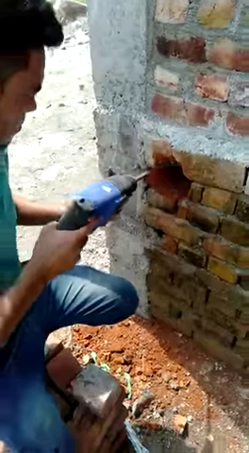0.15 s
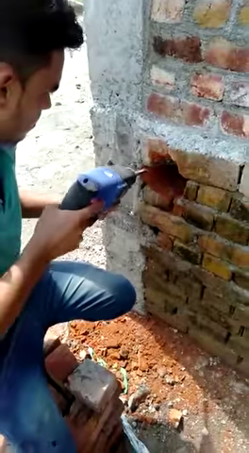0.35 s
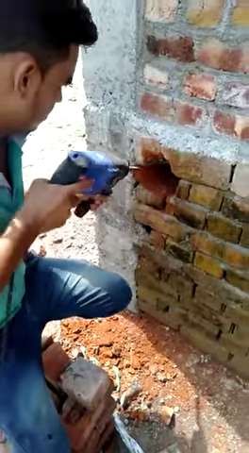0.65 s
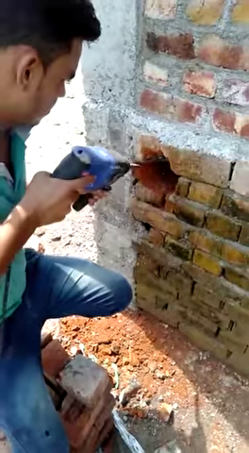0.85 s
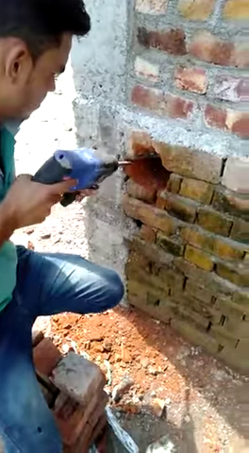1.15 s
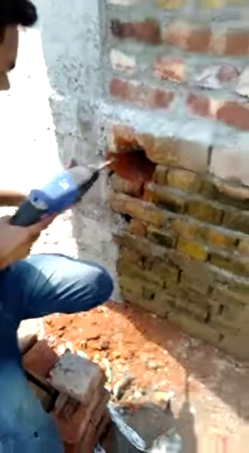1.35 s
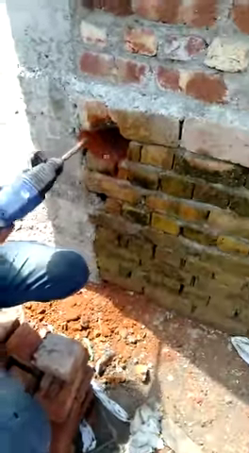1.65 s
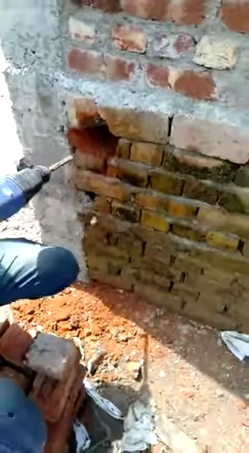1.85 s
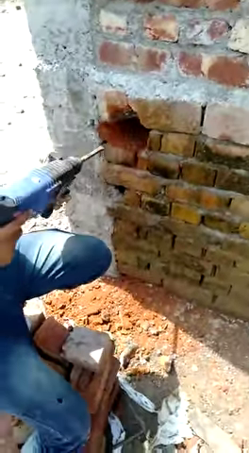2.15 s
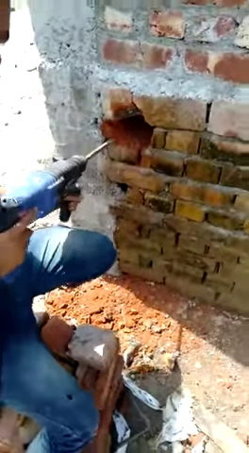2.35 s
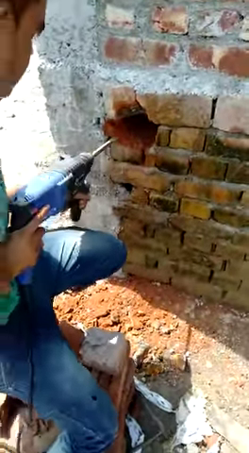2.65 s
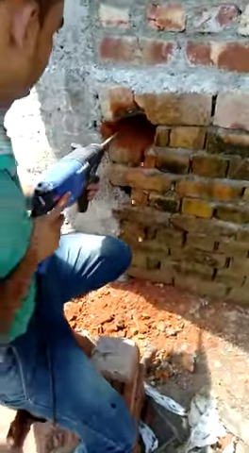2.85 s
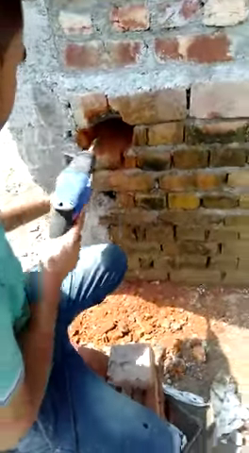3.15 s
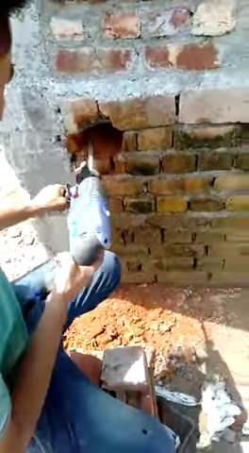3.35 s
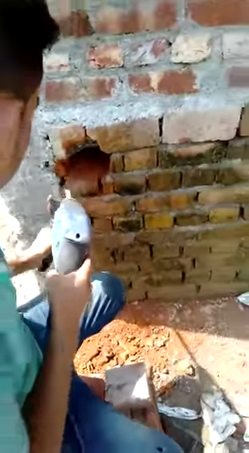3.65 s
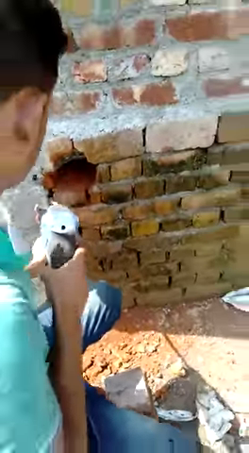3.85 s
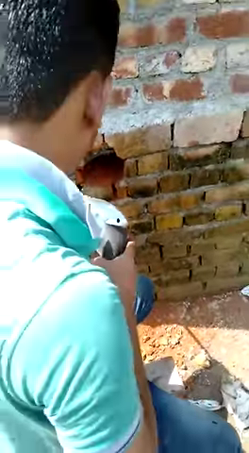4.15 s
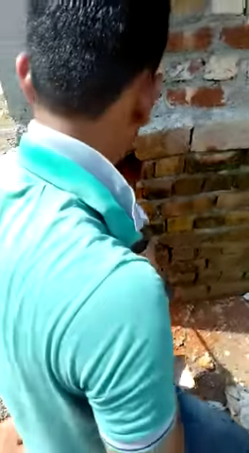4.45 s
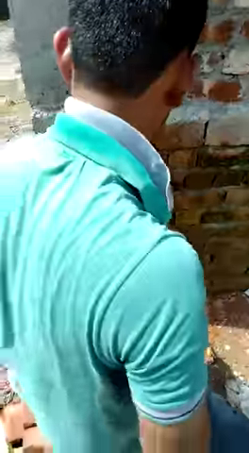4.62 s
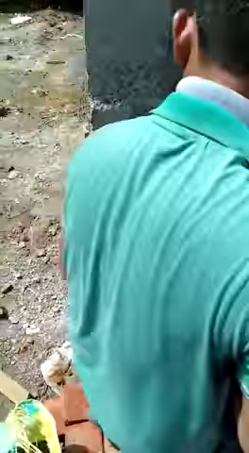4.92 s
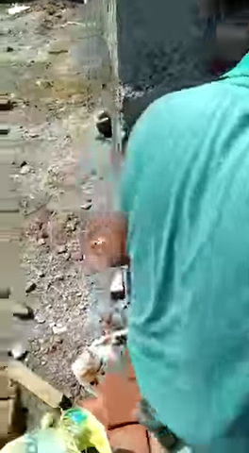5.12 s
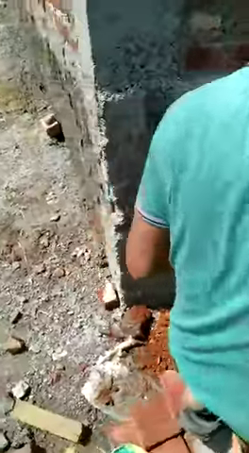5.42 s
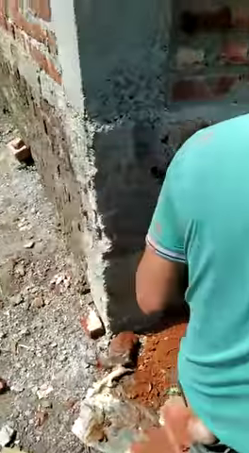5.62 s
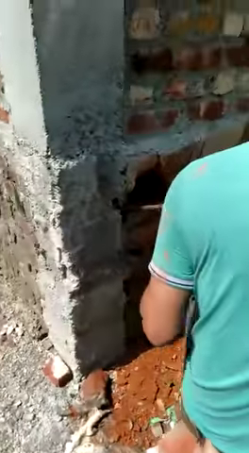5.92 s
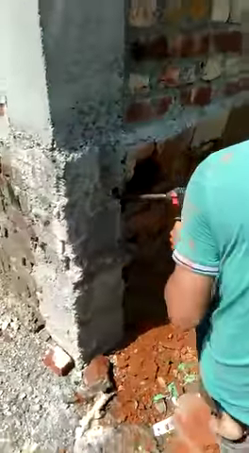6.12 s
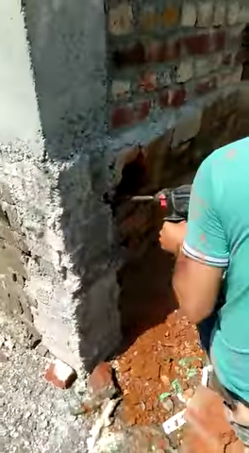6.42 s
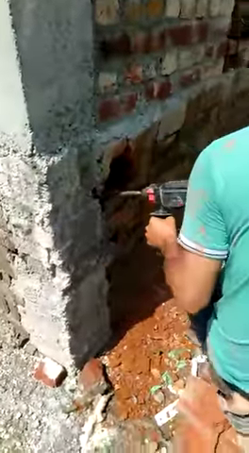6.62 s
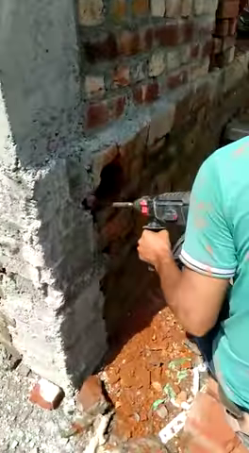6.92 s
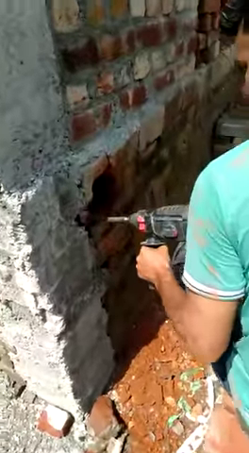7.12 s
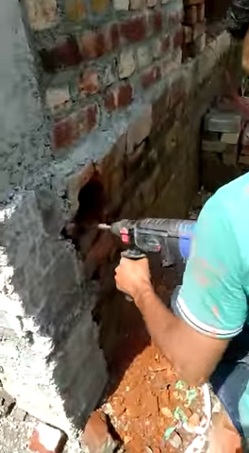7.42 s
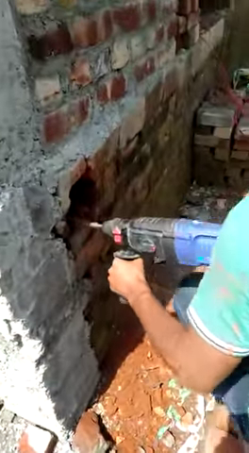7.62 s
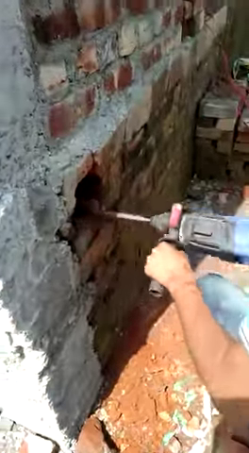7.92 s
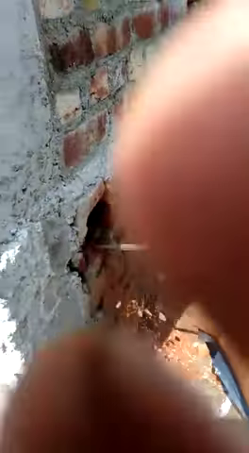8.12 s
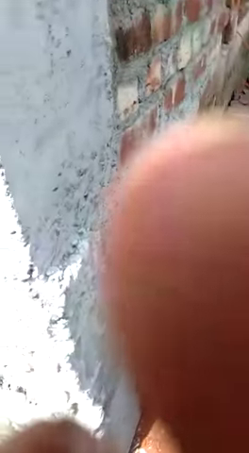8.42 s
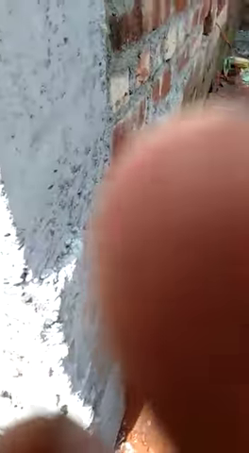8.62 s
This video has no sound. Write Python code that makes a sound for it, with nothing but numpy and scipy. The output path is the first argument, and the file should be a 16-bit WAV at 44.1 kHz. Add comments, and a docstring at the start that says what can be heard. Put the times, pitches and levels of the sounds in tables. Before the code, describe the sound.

Close by in the open air, a hammer drill buzzes and rattles against brick, then slows with a scatter of metallic clanks. It restarts, bites briefly, runs light with a duller gear whine for about two seconds, and digs in again before winding down. Gusts rumble and thump on the moving microphone, most strongly in the middle, and faint finger taps on its case finish the sound.

```python
"""A harsh, rapid hammering: an electric hammer drill chisels at a brick wall outdoors. A short burst
coasts down in loose clanks; a long one follows, runs light for two seconds midway and coasts down too.
Every piston stroke knocks the housing, rattles the gearbox and strikes the steel bit, while gears and
fan whine underneath. The microphone moves round behind the worker from right to left; wind buffets
its port, and a finger brushes its case at the end."""
import sys
import numpy as np
from scipy import signal
from scipy.fft import rfft, irfft
from scipy.io import wavfile
from scipy.ndimage import uniform_filter1d

SR = 44100
rng = np.random.default_rng(int(sys.argv[2]) if len(sys.argv) > 2 else 0)


def transcribe(u):
    """Save the signal u as a 16-bit wav file named by the first command-line argument.

    u: samples, shape (n,) or (channels, n), limited to [-1, 1]; the rate is SR.
    q: integer samples, one column per channel.
    """
    v = np.clip(np.atleast_2d(u).T, -1, 1)
    q = np.round(v * 32767).astype(np.int16)
    wavfile.write(sys.argv[1], SR, q)


N = 386757
T = np.arange(N) / SR
FULL_HZ = 66.2  # stroke rate at full speed

# Speed that trigger and load allow: t/s, stroke rate/Hz. All levels below are relative.
STROKE_RATE = [(0.0, 62), (0.1, 49.7), (0.2, 60.7), (0.35, 65.5), (0.7, 66.5), (1.1, 65.9), (1.47, 66.3),
               (2.8, 65.5), (3.1, 67.3), (3.45, 53.2), (4.03, 50.2), (4.15, 47.9), (4.55, 45.4),
               (5.015, 44.2), (5.205, 66.7), (5.42, 70.6), (5.56, 67.8), (5.66, 66.95), (5.92, 66.4),
               (7.44, 66.15)]
# Motor released: start/s, end/s, effort/dB, rate below which blows weaken/Hz,
# change per halving of that rate/dB, extra while the bit still leans on the brick/dB
COASTS = [(1.486, 2.476, -30.5, 29.3, -6.5, 4), (7.425, 8.772, -31, 36, -5.5, 0.5)]
# How hard the drill works in four successive stretches: t/s, level/dB
FIRST_PUSH = [(0.0, -27), (0.032, -27.5), (0.064, -33), (0.196, -28), (0.572, -28), (0.612, -25),
              (0.946, -27), (1.17, -25), (1.24, -26.5), (1.322, -23.5), (1.44, -25)]
SECOND_PUSH = [(2.599, -32), (2.603, -25.5), (2.648, -28.5), (3.156, -25.5), (3.212, -21.5), (3.261, -25.5)]
LIGHT_RUN = [(3.33, -29.5), (3.62, -27), (4.118, -29.5), (4.96, -29), (5.27, -29.5)]
LONG_PUSH = [(5.33, -25.5), (5.79, -26.5), (5.85, -30), (5.92, -25), (6.11, -27), (6.29, -25), (6.4, -30.5),
             (6.42, -29), (6.71, -24.5), (6.801, -26), (7.29, -25), (7.36, -32), (7.44, -26)]
# Seating of the bit: t/s, firmness (0 loose, 1 pressed home)
FIRMNESS = [(0, .2), (.2, .6), (.55, .96), (1.35, .95), (1.58, .75), (1.7, .3), (2.6, .15), (3.05, .75),
            (3.3, .3), (3.55, .92), (4.8, .88), (5.3, .35), (5.58, .97), (5.78, .98), (5.86, .7),
            (5.95, .98), (7.25, .96), (7.5, .5), (7.9, .2)]
# Acoustic shadow of the worker's back: t/s, depth (0-1)
SHADOW = [(3.75, 0.59), (4.7, 1), (5.25, 0.9), (5.45, 0.94)]
# Response of knock, rattle, ring and sizzle: base level/dB, dB per dB of effort, then the change
# when pressed home/dB, running light/dB, shadowed/dB, per halving of speed/dB
PART_RESPONSE = {"knock": (-37, 1.15, 4, -7, 0.5, -19), "rattle": (-30, 1, -2, 0.5, -1.67, 0),
                 "ring": (-34, 1, 1.6, 0.5, -9.5, -8), "sizzle": (-32, 1, -2.5, -7.5, -5.5, -42)}
# Housing response from each side: f/FULL_HZ, level/dB
KNOCK_RIGHT = [(2, -20), (3, -14), (4, -23), (5, -7), (6, -4), (7, 2), (8, 0), (9, -12), (10, -13),
               (11, -6), (12, -1), (13, -14), (14, 0), (15, -1), (16, -2.5), (17, 1), (18, 4), (19, 5),
               (20, .5), (21, -6), (22, -6), (23, -13), (25, -8), (26, 2), (27, -1.5), (28, -1.5),
               (30, -11)]
KNOCK_LEFT = [(3, -20), (4, -12), (5, -10), (6, -3), (7, 3), (8, -7), (9, 1), (10, 3), (11, -3.5), (12, 2),
              (13, -1.5), (14, .5), (16, 2.5), (17, 1.5), (18, -2), (19, -15), (20, -5.5), (21, -6),
              (22, -3.5), (23, -8), (24, -9), (25, -1), (26, 0), (28, -10), (29, -1.5), (31, -7), (34, -16)]
# Housing clatter with the bit loose: f/Hz, level/dB
CLATTER = [(200, -18.5), (330, -9), (450, -7.5), (600, -2), (800, -8.5), (1100, 0.5), (1600, -45)]
# Gearbox spectra from four standpoints and in the last coast-down: f/Hz, level/dB
RATTLE_RIGHT = [(410, -28), (700, -12.5), (773, -5), (841, -16), (903, -7), (1060, -2.5), (1220, 0),
                (1390, -6.5), (1510, -8), (1780, 3.5), (1950, -3), (2670, -3.5), (3090, -12.5), (3800, -14),
                (4940, -50), (8360, -120)]
RATTLE_CLOSE = [(410, -30), (700, -10.5), (812, -8), (923, -2), (1090, -6.5), (1280, -11), (1350, -1),
                (1470, -3), (1700, -6.5), (2080, 3.5), (2720, -14), (3800, -12.5), (4940, -52),
                (8360, -120)]
RATTLE_BEHIND = [(410, -31), (700, -4), (801, -19), (866, 1), (1010, -1), (1220, 4), (1340, 1), (1710, 3.5),
                 (2080, 1.5), (2380, -5), (2630, -1.5), (3800, -12), (4940, -33), (8360, -120)]
RATTLE_LEFT = [(410, -10.5), (700, -10.5), (773, -2.5), (872, -4), (1090, 2), (1260, -5.5), (1580, -7),
               (1940, 2.5), (2630, -14.5), (3070, -12), (3800, -16), (4940, -46), (8360, -120)]
RATTLE_COAST = [(410, -46), (700, -5.5), (1000, -1.5), (1480, 2.5), (1660, -20), (2490, -4), (2900, -23),
                (3800, -9), (4940, -44), (8360, -120)]
# Modes of the loose chuck and of the bit when clanking or free: f/Hz, bandwidth/Hz, level/dB
CHUCK_MODES = [(1540, 81, 9), (1810, 180, -0.5), (2000, 130, 0.5), (2720, 110, -3), (4190, 160, -8),
               (6560, 95, -24)]
BLOW_MODES = [(1020, 120, -3), (1520, 75, -0.5), (2070, 43, -3), (2645, 70, 0.5), (3900, 64, -4),
              (4300, 51, 0), (6440, 130, -5)]
FREE_MODES = [(4270, 120, 3), (2010, 77, -10)]
# High steel ring, from the first coast-down through the light run: f/Hz, bandwidth/Hz, level/dB
HIGH_RING_MODES = [(6230, 50, 4), (4310, 42, -9.5)]
# The steel's ring from each side, and its topmost sizzle: f/Hz, level/dB
RING_RIGHT = [(1760, -28), (3000, -12.5), (3920, -1.5), (4290, 2.5), (4630, -1.5), (5220, -3), (6450, 2),
              (7170, 0), (8600, -11), (10000, -12.5), (13000, -21), (22000, -120)]
RING_LEFT = [(1760, -19), (3000, -7.5), (3150, 0), (3650, -16.5), (4200, -3.5), (4820, -4), (6750, -0.5),
             (8090, -10.5), (9130, -11.5), (10000, -16), (13000, -21), (22000, -120)]
SIZZLE = [(5590, -48), (9500, -23), (11400, -15), (12700, -0.5), (13500, -9.5), (15200, 4.5), (16000, -14)]
# Surges of scraping as the bit bites: t/s, ring level/dB, sizzle level/dB
BITE = [(.7, 3.5, 0.5), (1.4, 3, -1), (1.6, 2.5, 8), (1.8, -1, -6.5), (2.6, 2, 3), (3.0, 3, -2.5),
        (3.6, 1, 0.5), (5.25, -1, 1), (5.37, -1.5, 1), (5.45, -1, 0), (5.6, -1, 1.5), (5.79, 3.5, 6),
        (5.85, -3, 6), (5.92, 1, -2), (6.03, 1, 5), (6.14, -3, 0), (6.22, -2.5, 3), (6.35, 0.5, 1.5),
        (6.65, 1.5, -1), (7.23, 2, -2), (7.4, 3.5, 6), (7.55, 2, 6)]
# Fresh brick sizzles most, until dust packs the hole: t/s, extra level/dB
FRESH_BRICK = [(0, 3), (2.56, 4.5), (5.33, 4)]
# Gear-mesh and fan lines: f/stroke rate, level/dB, change when coasting/dB
WHINE_ORDERS = [(15, -22, 0), (19, -18, 0), (21, -19, 0), (33, -15, -4), (51, -21, 0), (66, -10, -1.5)]
# How well the shell radiates the whine: f/Hz, level/dB
SHELL_RADIATION = [(900, -2), (1100, 2), (1280, 0), (1500, 4), (1750, 5), (2080, 5), (2400, -3),
                   (3000, -4.5), (3400, -2), (3700, -14), (4400, -12)]
# Parts that sing out as grip and angle change: start/s, end/s, f/Hz, bandwidth/Hz, level/dB
SINGING_PARTS = [(0.619, 1.12, 1722, 25, -36), (1.52, 2.042, 2660, 150, -40), (5.337, 5.802, 1075, 45, -35),
                 (5.52, 5.8, 1910, 55, -38), (7.89, 8.307, 1536, 100, -43)]
# Single blows of the loose bit at low speed, and three sharp, bright clicks: t/s, level/dB
LOOSE_BLOWS = [(0.03, -14.5), (1.632, -19), (1.651, -19), (1.669, -17), (1.687, -17.5), (1.707, -13),
               (1.728, -20), (1.75, -15), (1.772, -15), (1.797, -14), (1.823, -14.5), (1.851, -14),
               (1.88, -13.5), (1.915, -16), (1.937, -18.5), (1.949, -19), (1.976, -18), (2.018, -20.5),
               (2.065, -21), (2.116, -20.5), (2.2216, -29.5), (2.324, -33), (2.4598, -24.5), (2.527, -28),
               (2.5504, -18), (2.5615, -16), (2.587, -16.5), (2.6527, -15), (2.724, -14), (7.593, -15.5),
               (7.612, -17), (7.632, -14), (7.646, -13.5), (7.674, -14.5), (7.691, -14), (7.715, -18),
               (7.739, -13), (7.774, -16), (7.793, -18.5), (7.804, -17), (7.824, -19), (7.868, -17.5),
               (7.894, -20), (7.948, -22), (7.979, -22.5), (8.029, -25), (8.121, -28)]
BRIGHT_CLICKS = [(0.049, -14.5), (2.5504, -16), (7.804, -18)]
# Spectrum of a loose blow: f/Hz, level/dB
CLANK = [(600, 0), (1050, 3.5), (1550, 0.5), (2100, -1.5), (2600, -2.5), (3300, -4), (4350, -6),
         (5200, -8.5), (6500, -5), (9500, -21), (15000, -23)]
# Finger taps on the case: t/s, level/dB
TAPS = [(8.303, -17.5), (8.346, -27.5), (8.4223, -30), (8.4652, -45), (8.543, -27), (8.6837, -40)]
# Response of the case: f/Hz, level/dB
CASE_RESPONSE = [(500, 2), (1500, -3), (4000, -4), (6500, 2), (10000, -15), (15500, 6.5)]
# Wind strength at the port: t/s, level/dB
WIND_STRENGTH = [(0, -41.5), (.6, -48), (1.35, -40.5), (1.65, -41), (2.53, -37.5), (2.7, -48.5),
                 (3.25, -46.5), (3.4, -34), (3.8, -28.5), (3.92, -37.5), (4.4, -29.5), (4.7, -38.5),
                 (5.12, -29.5), (5.3, -38.5), (6.1, -48.5), (7.4, -43.5), (8.1, -36.5), (8.7, -49.5)]
# Single gusts: t/s, level/dB, rise time/s
GUSTS = [(2.074, -25, 0.013), (2.507, -18, 0.013), (3.538, -13.5, 0.02), (3.608, -16, 0.012),
         (3.719, -14.5, 0.019), (3.779, -16, 0.033), (3.837, -10.5, 0.01), (4.229, -19, 0.015),
         (4.279, -18, 0.011), (4.4, -19.5, 0.021), (4.578, -11, 0.013), (4.818, -17, 0.0091),
         (5.08, -14.5, 0.013), (5.142, -15.5, 0.0098), (6.348, -28.5, 0.012), (7.129, -29, 0.017),
         (7.78, -21, 0.014), (7.881, -20.5, 0.024), (8.068, -23, 0.029), (8.191, -26, 0.028),
         (8.34, -23.5, 0.026), (8.738, -24, 0.014)]
# Spectra of wind rumble, flutter, gust thumps and the outdoor background: f/Hz, level/dB
RUMBLE = [(15, -14), (35, 1.5), (75, -2), (130, -15.5)]
FLUTTER = [(70, -9.5), (115, 0.5), (190, -3), (270, -13), (400, -23.5), (900, -71)]
THUMP = [(60, -9), (130, 7), (240, -4), (380, -19), (600, -41)]
AIR = [(59, -35), (100, -2), (249, -21), (358, -10), (452, -5), (595, -11), (1150, -8.5), (2320, -20.5),
       (8830, -27), (16000, -18)]


def drill():
    """Superposition: one shaft drives every part, so their pulses and tones share one stroke rate."""
    hz, effort_db, halvings = shaft()
    strokes = np.cumsum(hz) / SR
    press = np.clip(curves(FIRMNESS)[0], 0, 1)
    knock_db, rattle_db, ring_db, sizzle_db = part_levels(effort_db, press, halvings)
    knock = undb(knock_db) * housing(strokes, hz, press)
    gears = undb(rattle_db) * (gearbox(strokes, hz, press) + motor_whine(strokes, hz))
    machine = knock + gears + singing_parts(strokes)
    steel = bit(strokes, hz, ring_db, sizzle_db) + loose_blows()
    return machine + reflections(steel + bright_clicks())


def shaft(coast_s=1.29, spin_up_s=.125, shake_hz=42, lean_s=.11):
    """Friction brakes the released motor. Gives stroke rate, effort and halvings of the rate."""
    hz = curves(STROKE_RATE)[0]
    effort_db = curves(np.vstack([FIRST_PUSH, SECOND_PUSH, LIGHT_RUN, LONG_PUSH]))[0]
    fall_db, halvings = 0, 0
    for let_go, until, coast_db, strike_hz, halving_db, lean_db in COASTS:
        released = T > let_go
        run_down = np.clip(1 - (T - let_go) / coast_s, 0, 1) ** 2
        spin_up = 1 - np.exp(-np.maximum(T - until, 0) / spin_up_s)
        hz = np.maximum(hz * np.maximum(run_down, spin_up), 2)
        shake_db = 3 * np.exp(-((hz - shake_hz) / 5) ** 2)  # the loose tool shakes harder near this rate
        leaning = np.exp(-((T - let_go) / lean_s) ** 2)
        effort_db = np.where(released & (T < until), coast_db + shake_db + lean_db * leaning, effort_db)
        halvings = np.where(released, np.maximum(np.log2(strike_hz / hz), 0), halvings)
        fall_db = np.where(released, halving_db, fall_db)
    return hz, uniform_filter1d(effort_db, size=1500) + fall_db * halvings, halvings


def running_light(start=3.27, end=5.3, ease_s=.0094):
    """Unloading: 1 while the bit is drawn back from the brick, else 0."""
    return (crossfade(start, start + ease_s)[1] * crossfade(end, end + ease_s)[0]) ** 2


def part_levels(effort_db, press, halvings, usual_db=-28, dust_s=.89):
    """Radiation follows the driving force; slow strokes and the worker's shadow dull the steel."""
    light, shadow = running_light(), curves(SHADOW)[0]
    knock, rattle, ring, sizzle = (
        base_db + follow * (effort_db - usual_db) + press_db * press + light_db * light
        + shadow_db * shadow + slow_db * halvings
        for base_db, follow, press_db, light_db, shadow_db, slow_db in PART_RESPONSE.values())
    jolt_db = 7.5 * np.exp(-((T - 2.553) / .015) ** 2)  # the gears take up their slack at the restart
    fresh_db = sum(db * (T >= s) * np.exp(-np.abs(T - s) / dust_s) for s, db in FRESH_BRICK)
    uneven_db = wander(12)  # uneven brick makes the scraping waver
    ring_bite, sizzle_bite = curves(BITE)
    sizzle = sizzle + uneven_db + fresh_db + sizzle_bite
    return knock, rattle + jolt_db, ring + uneven_db + ring_bite, sizzle


def housing(strokes, hz, press, hum_db=-23):
    """Periodic impact: piston knocks make a harmonic buzz under pressure, a clatter when loose."""
    pulses = stroke_pulses(strokes, jitter=.002, scatter_db=.8)
    # The small shell radiates little bass.
    pulses = signal.sosfilt(signal.butter(4, 270, "high", fs=SR, output="sos"), pulses)
    for centre_hz in (502, 829, 1250, 1895):  # dispersion: all-pass stages delay these bands
        pulses = pulses - 2 * signal.lfilter(*signal.iirpeak(centre_hz, 3.5, SR), pulses)
    right = colour(pulses, [(k * FULL_HZ, db) for k, db in KNOCK_RIGHT])
    left = colour(pulses, [(k * FULL_HZ, db) for k, db in KNOCK_LEFT])
    hum = np.sqrt(2) * np.sin(2 * np.pi * 2 * strokes)  # the body shakes at twice the stroke rate
    before, after = crossfade(4.7, 4.75)
    buzz = before * right + after * (undb(-.5) * left + undb(hum_db) * hum)
    clatter = noise() * (.5 + stroke_envelope(strokes, hz, lead=.26, decay_s=.034, scatter_db=2))
    return np.sqrt(press) * buzz + undb(-2.5) * np.sqrt(1 - press) * colour(clatter, CLATTER)


def gearbox(strokes, hz, press):
    """Contact noise: gears and piston rattle before and at each blow; the slack chuck and bit ring."""
    swing = stroke_envelope(strokes, hz, lead=.32, decay_s=.0024, scatter_db=3)
    blow = stroke_envelope(strokes, hz, lead=.047, decay_s=.0088, scatter_db=3)
    light = running_light()
    pulsing = .39 * swing ** 2 + .5 * blow ** 2
    power = .5 + pulsing + .5 * light * (pulsing.mean() - pulsing)  # steadier when running light
    shake = tooth_contacts(strokes, press, light) * np.sqrt(power)
    rattle = colour(shake, RATTLE_RIGHT)
    for spectrum, start, end in [(RATTLE_CLOSE, 2.1, 2.5), (RATTLE_BEHIND, 3.25, 3.45),
                                 (RATTLE_LEFT, 5.05, 5.4), (RATTLE_COAST, 7.2, 7.6)]:
        old, new = crossfade(start, end)
        rattle = old * rattle + new * colour(shake, spectrum)
    slack = np.clip(1 - hz / FULL_HZ, 0, 1)  # at low speed the bit lies loose in the chuck
    chuck = undb(-9.5 + 12.8 * slack * (1 - light)) * resonate(noise() * (.89 + blow), CHUCK_MODES)
    free_bit = undb(-11.5) * light * resonate(noise(), FREE_MODES)
    return undb(1.5 - 2 * slack) * rattle + chuck + free_bit


def tooth_contacts(strokes, press, light):
    """Periodicity: the same teeth touch on every turn, so part of their noise becomes harmonic."""
    phases, orders = np.exp(2j * np.pi * rng.random(257)), np.arange(257)
    cycles = (irfft(phases * (orders > lowest)) for lowest in (30, 8))
    upper, wide = (unit(np.interp(strokes % 1, np.linspace(0, 1, 512), cycle)) for cycle in cycles)
    repeating = (1 - light) * upper + light * wide  # running light, lower harmonics buzz too
    share = (.52 - .15 * light) * press ** 2
    return np.sqrt(share) * repeating + np.sqrt(1 - share) * noise()


def bit(strokes, hz, ring_db, sizzle_db):
    """Impact excitation: the struck steel rings, bounces and crushes grit."""
    strike = stroke_envelope(strokes, hz, lead=.02, decay_s=.0042, scatter_db=1.5)
    bounce = stroke_envelope(strokes, hz, lead=.55, decay_s=.003, scatter_db=3)
    grit = noise() * undb(2 * wander(1500))
    right = colour(grit * np.sqrt(5 + strike ** 2 + .14 * bounce ** 2), RING_RIGHT)
    _, entering = crossfade(1.4, 1.46)
    right = right + undb(-11) * entering * resonate(grit * (1.3 + strike), HIGH_RING_MODES)
    left = undb(3) * colour(grit * np.sqrt(.76 + strike ** 2), RING_LEFT)
    before, after = crossfade(5.1, 5.5)  # late in the long burst the ring is heard from the left
    sizzle = colour(grit * np.sqrt(.5 + strike ** 2 + .011 * bounce ** 2), SIZZLE)
    # As the tip shifts in the hole, the top resonances wax and wane independently.
    shimmer = sum((undb(4 * wander(7)) - 1) * signal.lfilter(*signal.iirpeak(mode_hz, 14, SR), sizzle)
                  for mode_hz in (12600, 13900, 15100))
    return undb(ring_db) * (before * right + after * left) + undb(sizzle_db) * unit(sizzle + shimmer)


def motor_whine(strokes, hz, pull_hz_per_s=300):
    """Rotational harmonics: gear teeth and fan blades whine at multiples of the stroke rate."""
    light = running_light()
    hammering = np.clip((hz - 34) / 20, 0, 1) * (1 - light)
    acceleration = np.gradient(hz) * SR
    pull = np.clip(acceleration / pull_hz_per_s, 0, 1) ** 3  # speeding up loads the gears
    coasting = (acceleration < 0) * np.clip((42 - hz) / 8, 0, 1)
    smoothness = np.maximum(light, .6 * coasting)
    turns = strokes + (.0011 + .0016 * (1 - smoothness)) * wander(160) + .003 * wander(25)
    shell_hz, shell_db = np.transpose(SHELL_RADIATION)
    whine = 0
    for order, db, coast_db in WHINE_ORDERS:
        line_db = db + coast_db * coasting + np.interp(order * hz, shell_hz, shell_db) + 2.5 * wander(40)
        whine = whine + undb(line_db) * np.sin(2 * np.pi * order * turns)
    return undb(4 + 3 * pull - 10 * hammering) * whine


def singing_parts(strokes):
    """Forced resonance: the strokes set single parts of the tool ringing for a while."""
    drive = unit(stroke_pulses(strokes, jitter=.005, scatter_db=2)) + .6 * noise()
    out = np.zeros(N)
    for start, end, hz, width, db in SINGING_PARTS:
        span = slice(int(start * SR), int(end * SR))
        ring = resonate(drive[span], [(hz, width, 0)])
        ring = resonate(ring, [(hz, 4 * width, 0)])  # steepens the skirts of the peak
        out[span] += undb(db) * ring * signal.windows.tukey(len(ring), .3)
    return out


def loose_blows(decay_s=.0045):
    """Free vibration: the bit clanks on chuck and brick and rings on; harder blows are brighter."""
    age = T[:SR // 16]
    envelope = (1 - np.exp(-age / .0003)) * (np.exp(-age / decay_s) + .1 * np.exp(-age / .018))
    body, treble = np.zeros((2, N))
    for s, db in LOOSE_BLOWS:
        span = slice(int(s * SR), int(s * SR) + len(age))
        contact = undb(db) * envelope * rng.standard_normal(len(age))
        body[span] += contact
        treble[span] += undb(1.5 * (db + 19)) * contact
    clank = undb(-8) * colour(body, CLANK) + undb(-13) * resonate(body, BLOW_MODES)
    return np.std(body) * clank + undb(-15) * np.std(treble) * colour(treble, SIZZLE)


def bright_clicks():
    """Impulsive transients: three very short bursts of treble noise are heard as sharp clicks."""
    clicks = sum(undb(db) * noise_burst(s, decay_s=.00091) for s, db in BRIGHT_CLICKS)
    return np.std(clicks) * colour(clicks, SIZZLE)


def reflections(x, echo_db=-13):
    """Early reflection: wall, pillar and ground within arm's reach scatter a short tail."""
    scatter = noise_burst(.0015, decay_s=.0075)[:SR // 20]
    return x + undb(echo_db) * signal.fftconvolve(x, scatter / np.linalg.norm(scatter))[:N]


def finger():
    """Structure-borne sound: a finger sliding over the microphone's case makes dry ticks."""
    taps = sum(undb(db) * noise_burst(s, decay_s=.0014) for s, db in TAPS)
    return undb(-3.5) * np.std(taps) * colour(taps, CASE_RESPONSE)


def wind(breeze_db=-38.5, flutter_growth=1.37):
    """Turbulent pressure at the port: a deep rumble and quicker thumps that crackle in strong gusts."""
    strength_db, swell = curves(WIND_STRENGTH)[0] + 2 * wander(9), gusts()
    flutter_db = breeze_db - 2.5 + flutter_growth * (strength_db - breeze_db)
    flutter = undb(flutter_db) * eddies(FLUTTER, rate_hz=45, depth_db=3.6)
    flutter = flutter + undb(-7) * swell * eddies(THUMP, rate_hz=40, depth_db=2.3)
    rumble = (undb(strength_db - 2) + undb(-13) * swell) * eddies(RUMBLE, rate_hz=22, depth_db=4.3)
    pressure = flutter * np.abs(flutter)  # grows with the square of an eddy's speed
    crackle = np.std(flutter ** 2) * colour(pressure * noise(), [(250, -5.5), (450, 1), (750, -18)])
    return rumble + flutter + undb(3) * crackle


def eddies(spectrum, rate_hz, depth_db):
    """Intermittency: turbulence of even strength breaks into puffs."""
    flow = colour(noise(), spectrum)
    flow = flow / np.sqrt(uniform_filter1d(flow ** 2, size=3000) + 1e-3)
    return unit(flow * undb(depth_db * np.minimum(wander(rate_hz), 1)))


def gusts():
    """Amplitude envelope of unsteady flow: each gust swells against the port and dies away."""
    swell = np.zeros(N)
    for s, db, rise_s in GUSTS:
        span = slice(int(s * SR), int(s * SR) + SR // 3)
        age = np.maximum(T[span] - s, 0) / rise_s
        swell[span] += undb(db) * (age * np.exp(1 - age)) ** 2
    return swell


def outdoor_air(level_db=-59):
    """Ambient noise: a faint broadband hush whose level wavers."""
    return undb(level_db + 2 * wander(30)) * colour(noise(), AIR)


def stroke_pulses(strokes, jitter, scatter_db, lead=.1):
    """Impulse train: one pulse a stroke, uneven in time and size; jitter and lead are in strokes."""
    chance = rng.standard_normal((int(strokes[-1]) - 1, 2))
    at = np.interp(np.arange(len(chance)) + 1 - lead + jitter * chance[:, 0], strokes, np.arange(N))
    size, sample = undb(scatter_db * chance[:, 1]), at.astype(int)
    early = np.bincount(sample, size * (1 - at % 1), N + 2)
    late = np.bincount(sample + 1, size * (at % 1), N + 2)
    return (early + late)[:N]


def stroke_envelope(strokes, hz, lead, decay_s, scatter_db):
    """Exponential decay, renewed at a random size `lead` of a cycle before each stroke; rms 1."""
    place = strokes + lead + 2
    chance = np.clip(rng.standard_normal(2048), -2, 1.5)[place.astype(int)]
    decay = np.exp(-(place % 1) / hz / decay_s)
    return unit(uniform_filter1d(undb(scatter_db * chance) * decay, size=70))


def noise_burst(s, decay_s):
    """Damped transient: noise that starts at time s and decays exponentially."""
    out, start = np.zeros(N), int(s * SR)
    age = T[:min(SR // 20, N - start)]
    out[start:start + len(age)] = rng.standard_normal(len(age)) * np.exp(-age / decay_s)
    return out


def resonate(x, modes):
    """Modal superposition of resonances (f/Hz, bandwidth/Hz, level/dB); rms 1."""
    return unit(sum(undb(db) * signal.lfilter(*signal.iirpeak(hz, hz / width, SR), x)
                    for hz, width, db in modes))


def colour(x, points, size=4096):
    """Minimum-phase filter through points (f/Hz, level/dB), falling steeply beyond them; rms 1."""
    hz, db = np.transpose(sorted(points))
    octave = np.log2(np.maximum(np.arange(size // 2 + 1), .5) * SR / size)
    outside = np.abs(octave - np.clip(octave, np.log2(hz[0]), np.log2(hz[-1])))
    gain_db = np.maximum(np.interp(octave, np.log2(hz), db) - 40 * outside, db.max() - 70)
    cepstrum = irfft(gain_db * np.log(10) / 20)
    cepstrum[1:size // 2] *= 2
    cepstrum[size // 2 + 1:] = 0
    return unit(signal.fftconvolve(x, irfft(np.exp(rfft(cepstrum))))[:N])


def crossfade(start, end):
    """Equal-power law: a falling and a rising weight between two times."""
    share = np.clip((T - start) / (end - start), 0, 1)
    return np.sqrt(1 - share), np.sqrt(share)


def wander(rate_hz):
    """Random modulation: smoothed steps at the given rate; rms 1."""
    hold = int(SR / rate_hz)
    steps = np.repeat(rng.standard_normal(N // hold + 1), hold)
    return unit(uniform_filter1d(uniform_filter1d(steps, hold), hold)[:N])


def noise():
    """White Gaussian noise."""
    return rng.standard_normal(N)


def curves(table):
    """Linear interpolation of a table's columns in time."""
    s, *columns = np.transpose(table)
    return [np.interp(T, s, column) for column in columns]


def undb(db):
    """Decibels to amplitude ratio."""
    return np.exp(np.asarray(db) * (np.log(10) / 20))


def unit(x):
    """Normalisation to rms 1."""
    return x / np.sqrt(np.mean(x ** 2))


def scene():
    """Pressures add in one channel: drill, finger, wind and air; the drill fades as the taps begin."""
    running, _ = crossfade(8.27, 8.34)
    tool = running * drill()
    air = outdoor_air()
    return (tool + finger() + wind() + air)[None]


def record(dry, top_hz=15900):
    """Band limiting: the microphone's steep low-pass cuts the highest treble."""
    return signal.sosfilt(signal.ellip(10, .2, 70, top_hz, fs=SR, output="sos"), dry)


dry = scene()
out = record(dry)
transcribe(out)
```